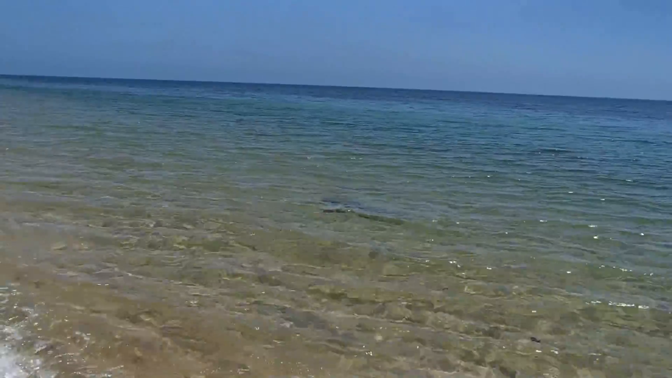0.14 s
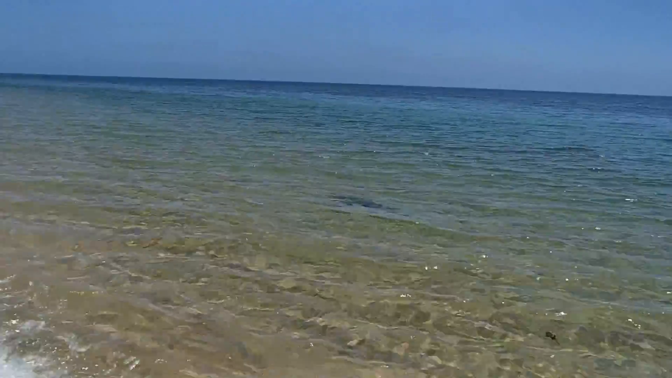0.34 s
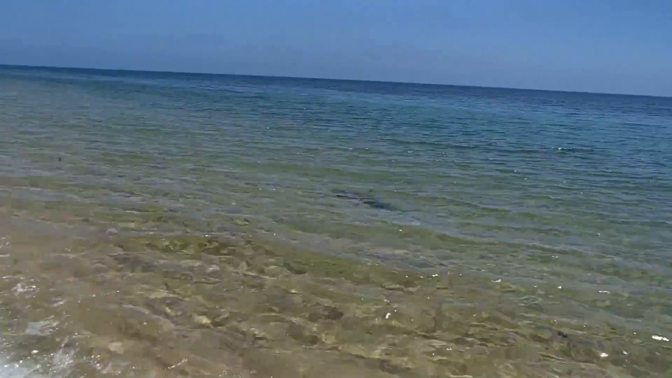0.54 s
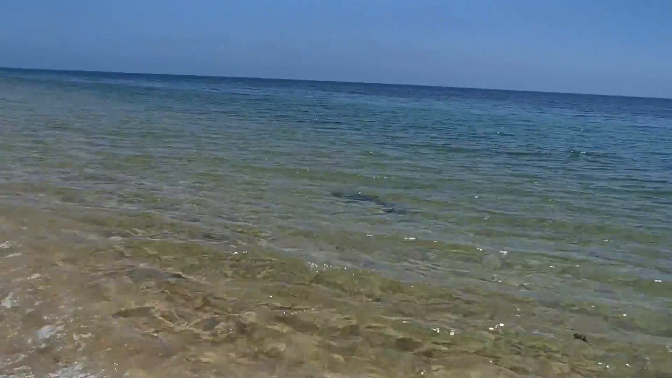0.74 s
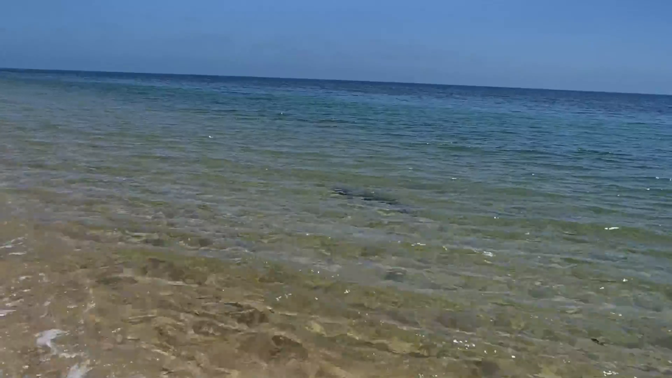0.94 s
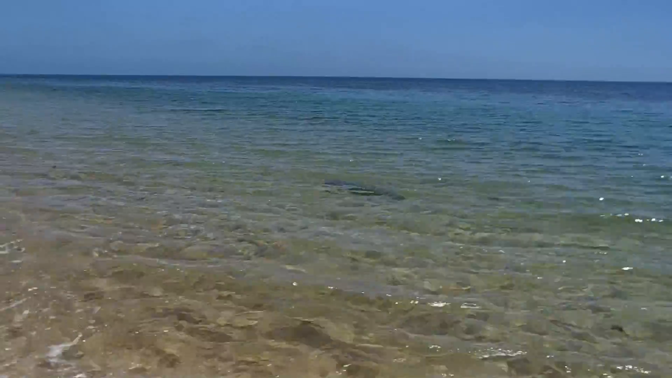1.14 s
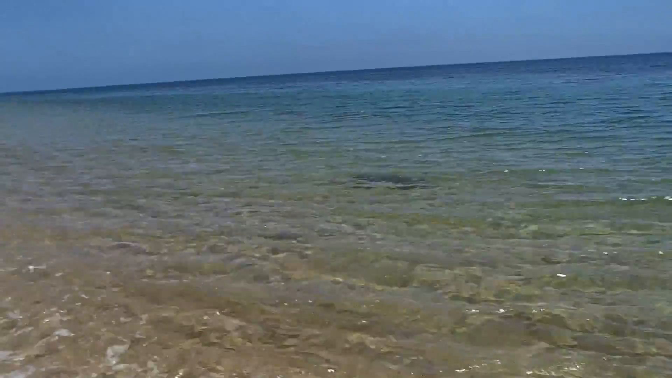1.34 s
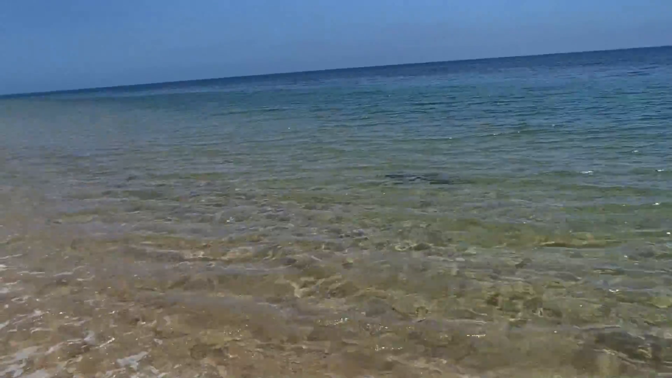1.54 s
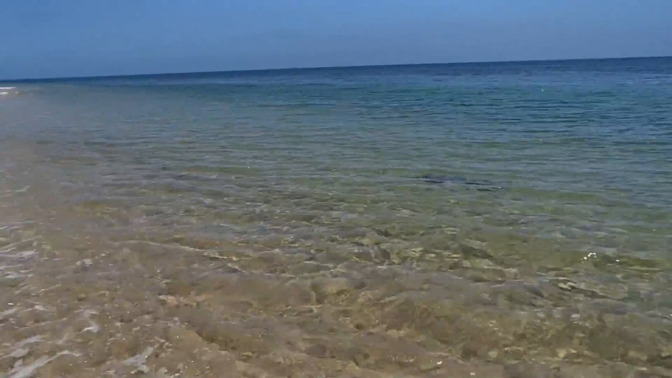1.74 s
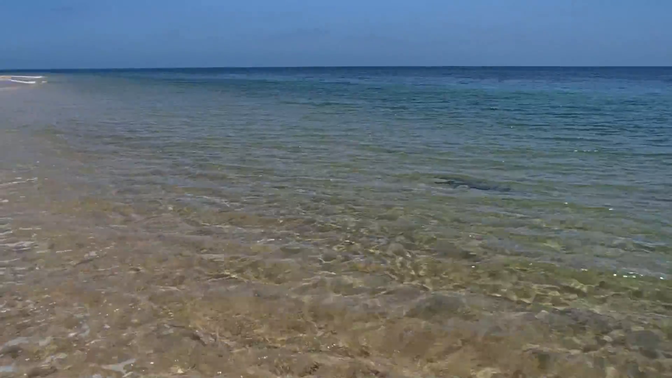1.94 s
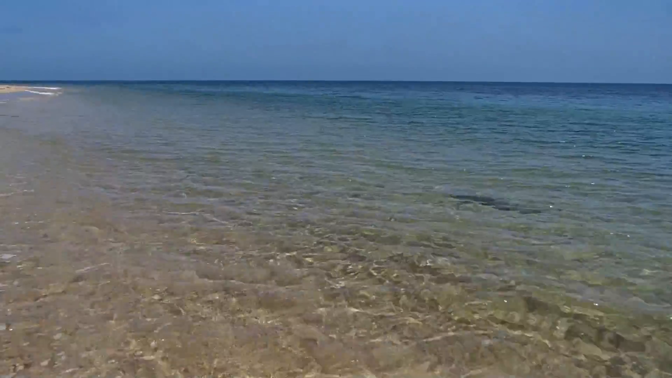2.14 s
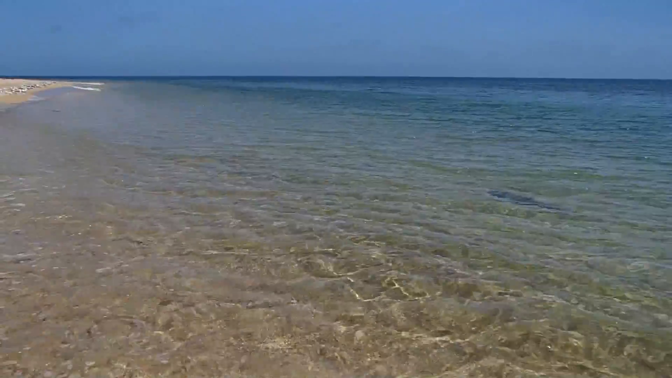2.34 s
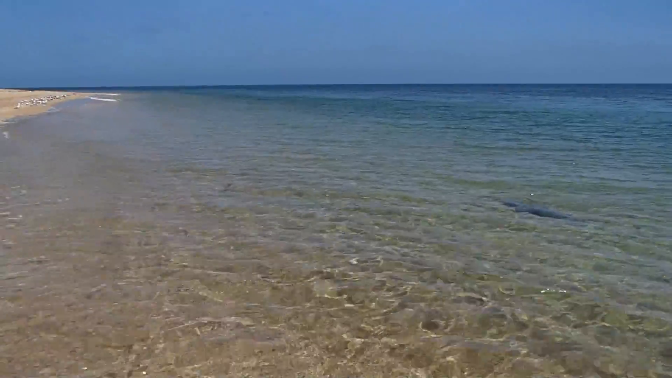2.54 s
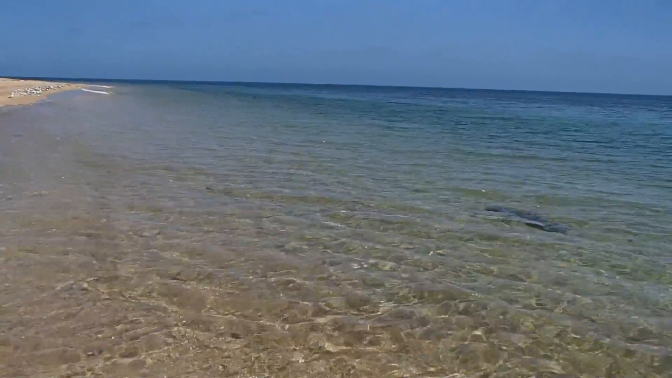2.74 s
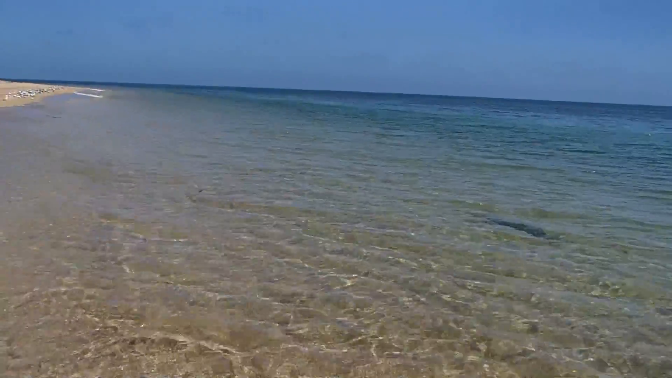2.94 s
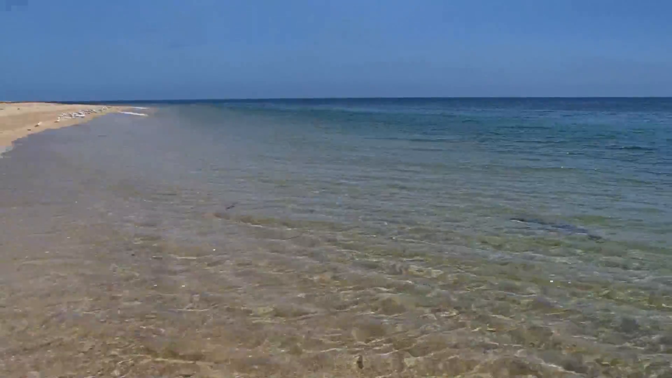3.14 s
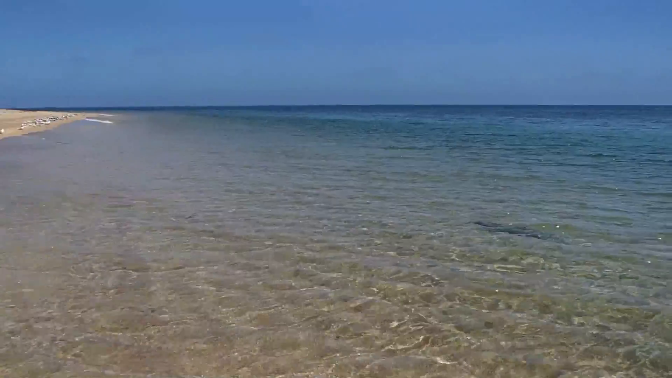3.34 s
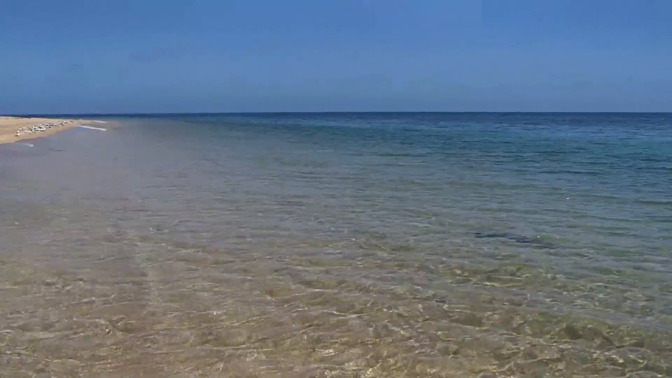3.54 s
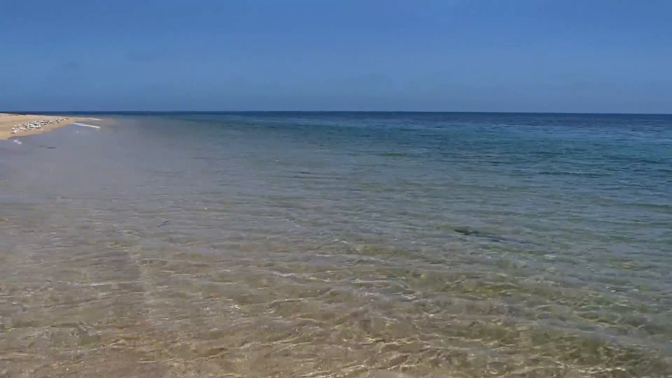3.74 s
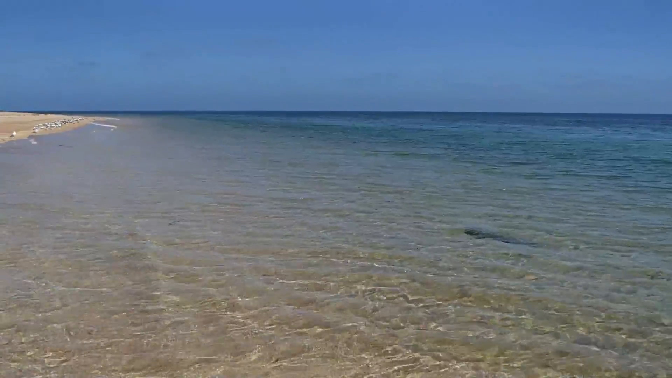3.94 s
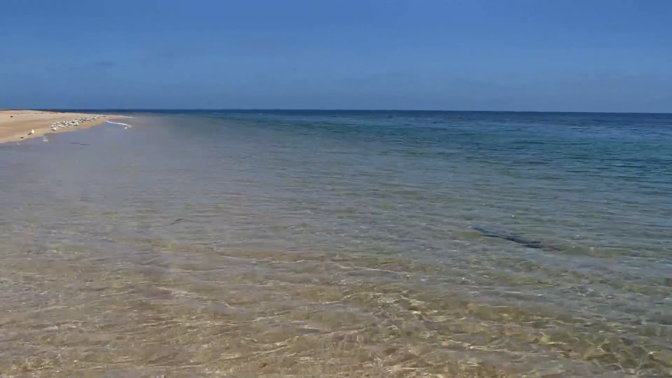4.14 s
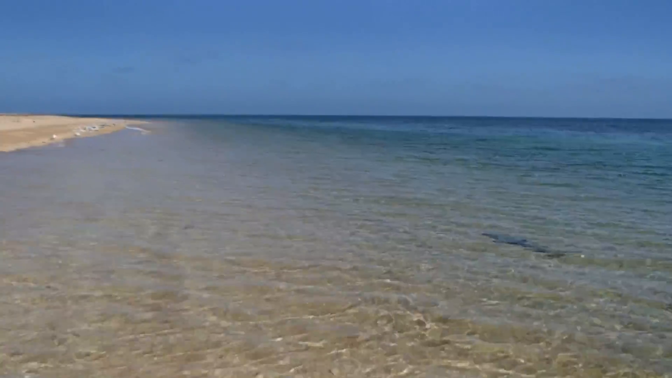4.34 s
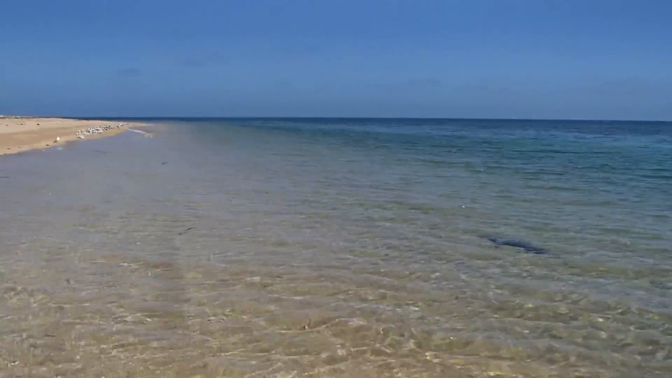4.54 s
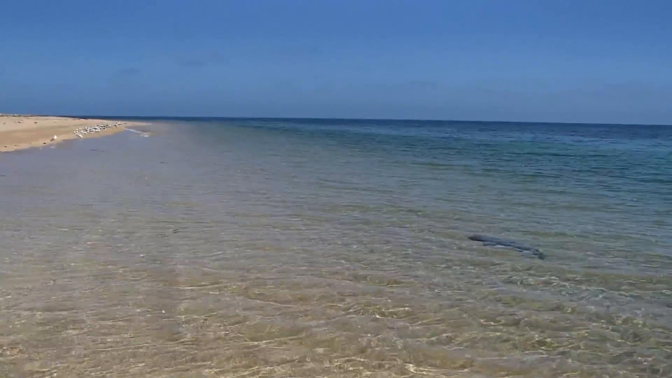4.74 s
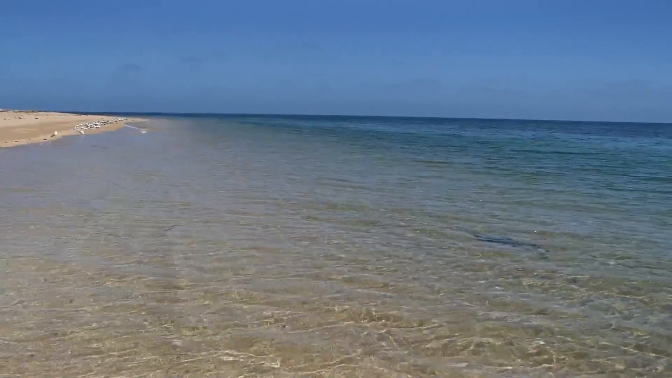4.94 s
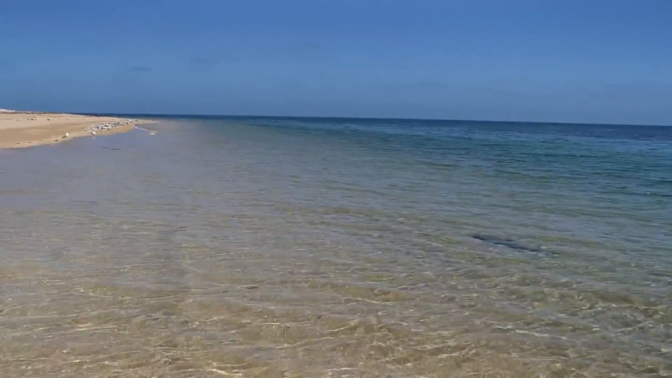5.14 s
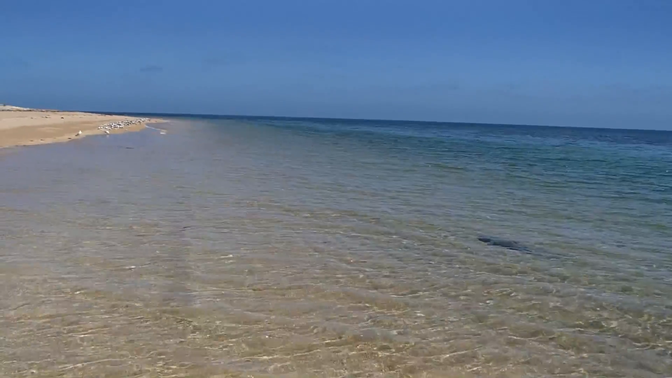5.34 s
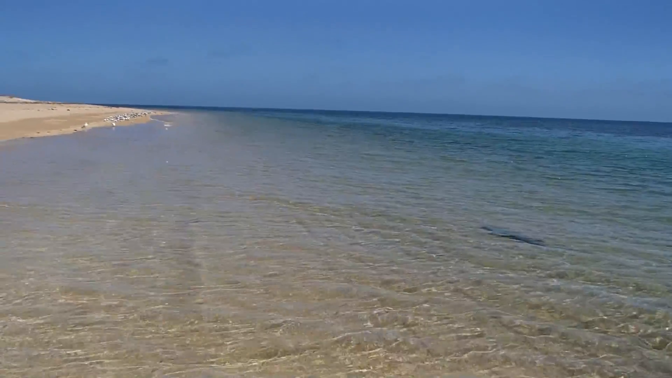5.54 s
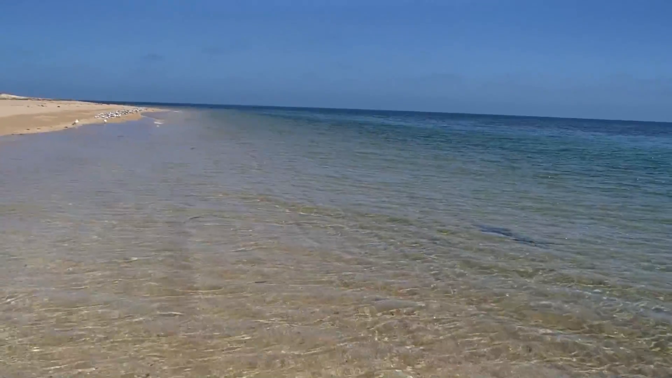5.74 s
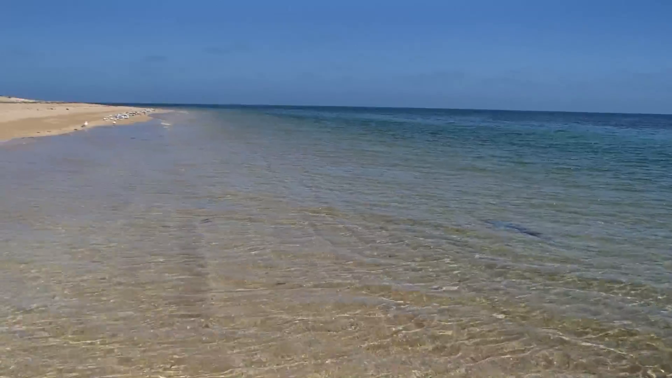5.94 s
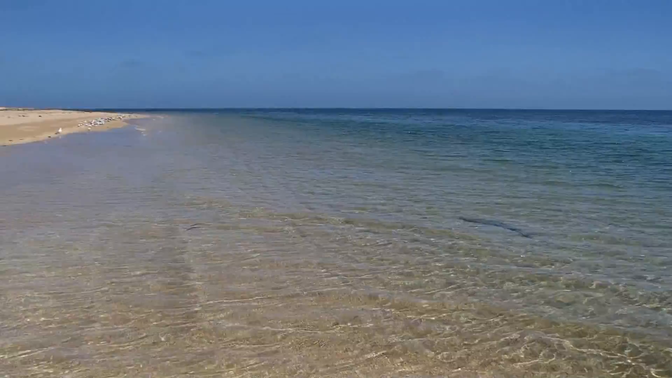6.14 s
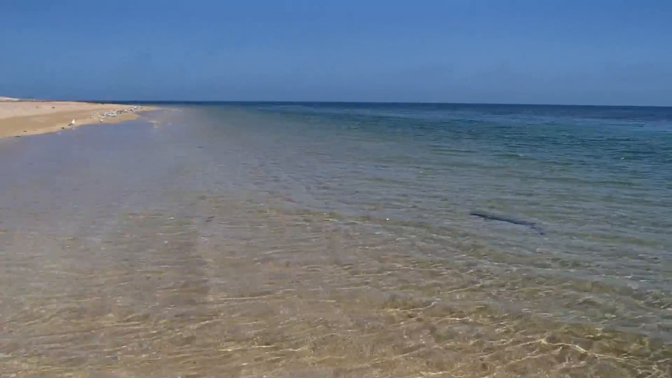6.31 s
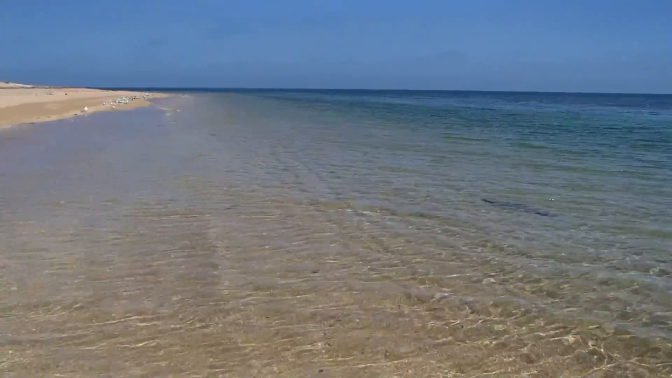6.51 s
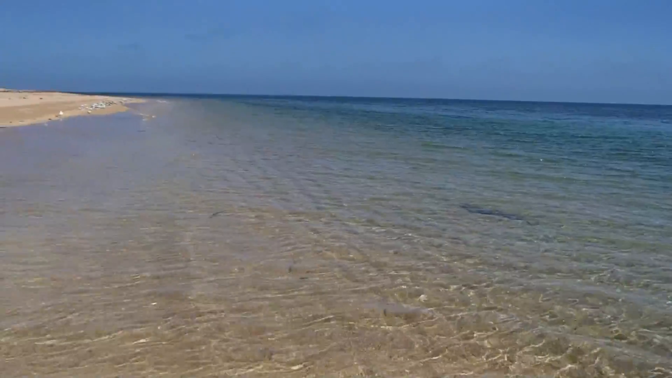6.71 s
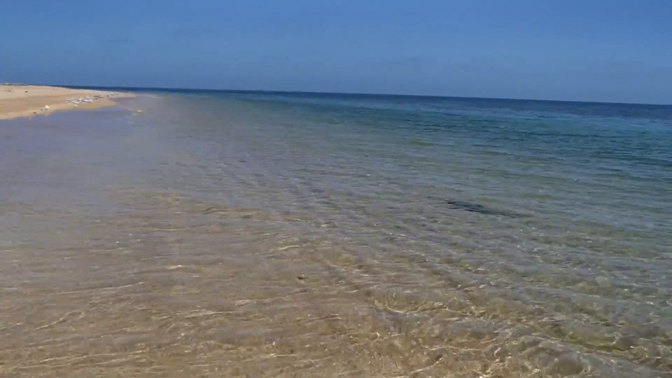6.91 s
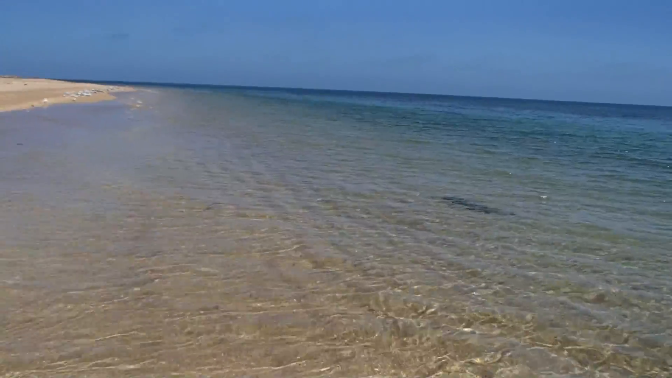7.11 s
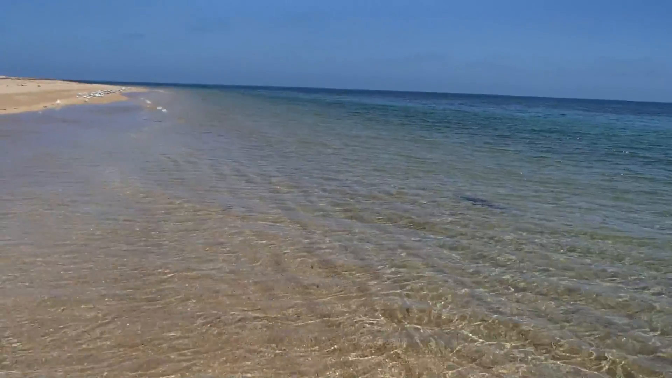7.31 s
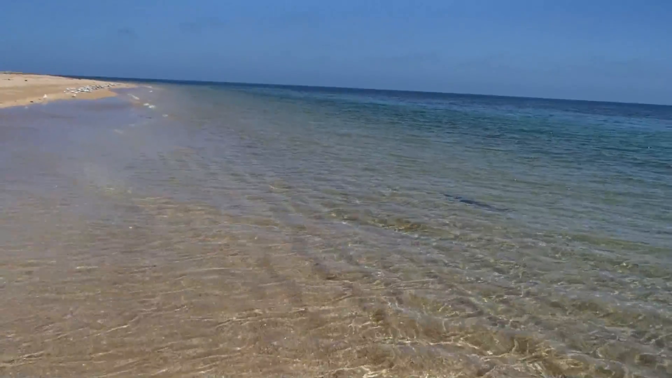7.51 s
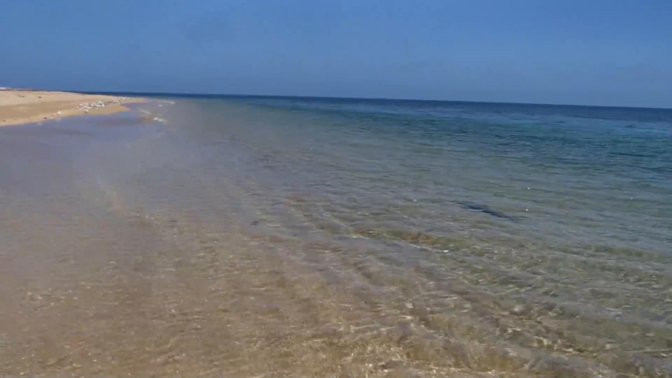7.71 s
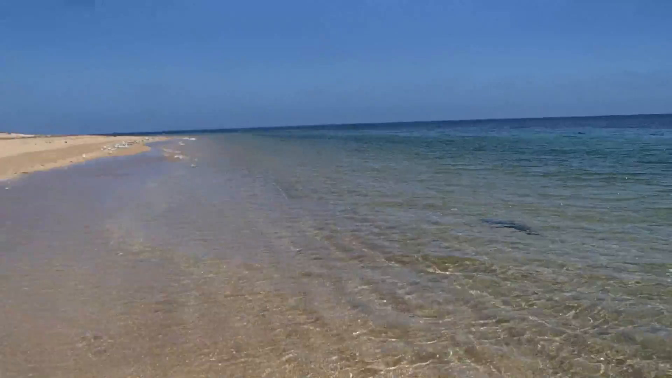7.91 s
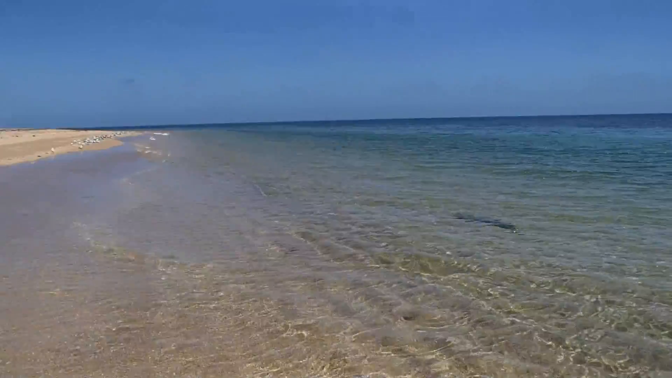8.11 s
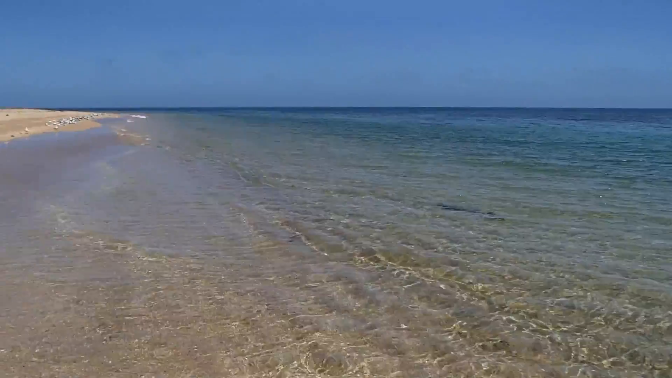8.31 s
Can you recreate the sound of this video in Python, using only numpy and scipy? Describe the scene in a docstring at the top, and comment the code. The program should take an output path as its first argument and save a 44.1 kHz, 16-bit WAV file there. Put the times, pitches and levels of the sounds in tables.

```python
"""Small waves on a sandy shore

Waves spill, run up the sand and fizz out, then ripples lap, plop and gulp, close to a camera in a plastic case.
Water is swarms of ringing bubbles over shaped noise; slaps and gulps are short tones of trapped air.
Light wind is low noise on the microphone. The case squeaks under the grip (harmonics), clicks (modes)
and thumps low under a hand, twice (a short tone with splatter noise, like the slaps)."""
import sys
import numpy as np
from scipy.fft import rfft, irfft, next_fast_len
from scipy.io import wavfile
from scipy.ndimage import map_coordinates

SR = 44100
rng = np.random.default_rng(int(sys.argv[2]) if len(sys.argv) > 2 else 0)


def write(x):
    x = np.atleast_2d(x).T
    wavfile.write(sys.argv[1], SR, np.round(np.clip(x, -1, 1) * 32767).astype(np.int16))

N = 373527  # length in samples, about 8.5 s


def amp(db):
    """Decibels to gain."""
    return np.exp(np.asarray(db) * float(np.log(10) / 20))


def decibels(power):
    """Power to decibels."""
    return 10 * np.log10(power + 1e-20)


def unit(x):
    """Scale to rms 1."""
    return x / np.sqrt(np.mean(x ** 2) + 1e-20)


def wobble(rate, size=N):
    """A smooth random curve through `rate` random points a second."""
    points = rng.standard_normal(int(size * rate / SR) + 4)
    return map_coordinates(points, [np.arange(size) * rate / SR])


def coloured(x, spectrum):
    """Filter x through (f/Hz, level/dB) points on a log frequency axis, then scale to rms 1."""
    m = next_fast_len(len(x) + 8192)  # spare room so the end does not wrap to the start
    hz, db = np.transpose(spectrum)
    log_hz = np.log(np.fft.rfftfreq(m, 1 / SR) + 1)  # +1 avoids log of zero
    gain = amp(np.interp(log_hz, np.log(hz), db))
    return unit(irfft(rfft(x, m) * gain, m)[:len(x)])


def fade(t, t60):
    """Exponential decay that falls 60 dB in t60."""
    return np.exp(t * (-float(np.log(1000)) / t60))


def add(track, s, sound):
    """Mix a sound into the track at time s, cut off at the track's end."""
    part = track[round(s * SR):][:len(sound)]
    part += sound[:len(part)]


def bubbles(rate, low_hz, high_hz, cycles, spread_db, rise=0.2, soft=0.23, size=900):
    """A swarm of damped rings of random size whose pitch climbs as they die."""
    count = int(rate * N / SR)
    when, pitch, strength, life = rng.random((count, 4)).astype(np.float32).T[:, :, None]
    hz = low_hz * (high_hz / low_hz) ** pitch
    t60 = np.minimum(cycles * (.5 + life) / hz, size / SR)
    t = np.arange(size, dtype=np.float32) / SR
    gain = amp(spread_db * np.minimum(-np.log(1 - strength), 5))  # a few bubbles are much louder
    age = np.minimum(t / t60, 1)  # share of the bubble's life
    envelope = gain * fade(age, 1) * (1 - fade(age, soft))  # soft start, then decay
    rings = envelope * np.sin(2 * np.pi * hz * t * (1 + rise / 2 * age))
    places = (when * N).astype(int) + np.arange(size)
    return np.bincount(places.ravel(), rings.ravel(), N)[:N]


def swell(crest_s, db, rise, fall):
    """Power that climbs to a crest and dies away, both in dB/s."""
    t = np.arange(N) / SR - crest_s
    return amp(db + np.minimum(rise * t, -fall * t)) ** 2


def surf():
    """Levels in dB of plunging, churning, foam, spray and falling drops, all driven by the waves."""
    # waves that swell to a crest and drain: (crest t/s, churning level/dB, rise/(dB/s), fall/(dB/s),
    # foam level/dB, spray level/dB before the lift in wash, falling drops level/dB)
    waves = [(.8, -26.5, 4.7, 37, -26.3, -40, -37), (1.08, -24, 32, 16.5, -25.3, -42, -47),
             (1.31, -24.5, 16.5, 52, -22.5, -35, -44), (1.88, -32.5, 35, 20, -35.5, -48.5, -49),
             (2.53, -35, 48, 8.5, -39, -58.5, -44), (3.5, -38.5, 39, 10.5, -44, -62.5, -47),
             (4.02, -42, 23, 18.5, -52.5, -62, -45.5), (4.53, -58, 11.5, 15.5, -37.5, -55.5, -56),
             (5.82, -46.6, 46, 19, -55.5, -73, -57), (6.66, -47, 30, 60, -58, -64, -58),
             (7.67, -47, 112, 30, -55, -70, -44.5), (7.82, -36.4, 75, 47, -41.5, -55.7, -41),
             (8.46, -40.5, 12, 20, -45.5, -63, -44)]
    # a wave folds over and traps a big pocket of air: (t/s, level/dB, rise/(dB/s), fall/(dB/s))
    breaks = [(1.28, -31.5, 80, 110), (1.57, -43.5, 42, 28.5), (2.72, -52.5, 72, 27), (3.72, -55, 80, 70),
              (8.08, -57.5, 40, 50)]
    calm_plunge_db, calm_churn_db, calm_foam_db, calm_spray_db = -65, -50, -53.5, -61.5  # between waves
    plunge_below_churn_db = -22.5  # big air pockets, relative to the churning
    fizz_below_churn_db, fizz_fall_db_per_s = -25.5, 5.5  # fine froth left behind by each crest

    churn, foam, spray, drops = np.zeros((4, N))  # powers
    for s, db, rise, fall, foam_db, spray_db, drops_db in waves:
        wave = swell(s, 0, rise, fall)
        churn += wave * amp(db) ** 2
        foam += wave * amp(foam_db) ** 2
        drops += wave * amp(drops_db) ** 2
        fizz = swell(s, db + fizz_below_churn_db, rise, fizz_fall_db_per_s)
        spray += wave * amp(spray_db) ** 2 + fizz
    plunge = churn * amp(plunge_below_churn_db) ** 2 + sum(swell(*row) for row in breaks)

    def over(power, calm_db):
        """Add the calm water's power and give the level in dB."""
        return decibels(power + amp(calm_db) ** 2)

    return (over(plunge, calm_plunge_db), over(churn, calm_churn_db), over(foam, calm_foam_db),
            over(spray, calm_spray_db), decibels(drops))


def water(spectrum, swarm, share, restless_db):
    """Near bubbles over the blur of countless far ones, swelling unevenly."""
    blur = coloured(rng.standard_normal(N), spectrum)
    mix = np.sqrt(1 - share) * blur + np.sqrt(share) * coloured(swarm, spectrum)
    return unit(mix * amp(restless_db * unit(wobble(22) + wobble(60))))


def wash(plunge_db, churn_db, foam_db, spray_db):
    """Big air pockets boom, middling ones churn, foam bursts on the sand and spray prickles."""
    # how bright each kind of water sounds: (f/Hz, relative level/dB)
    plunge_colour = [(70, -33), (130, -19), (200, -4.5), (300, 0.5), (400, 3), (480, -2), (700, -15),
                     (1500, -60)]
    churn_colour = [(250, -58), (480, -11), (620, -5), (780, -1.5), (1200, 0.5), (1600, -3), (2200, -3.5),
                    (3000, -12.5), (5000, -49), (9000, -50)]
    foam_colour = [(900, -32), (1800, -8), (2600, -2.5), (3400, 1.5), (3800, 1), (4200, -5.5), (4600, -2.5),
                   (5050, 0), (5700, -7.5), (6600, -12), (8500, -23), (14000, -56)]
    spray_colour = [(3500, -8), (6000, -0.5), (7500, 0.5), (9500, 0.5), (12000, -1), (15000, 1.5),
                    (16000, -1)]

    # share of single bubbles: those of the churning merge in the full rush, those of the spray stand out
    churn_share = .5 / (1 + amp(churn_db + 21.5))
    spray_share = 0.31 * amp(spray_db + 50.0) / (1 + amp(spray_db + 49))

    pockets = bubbles(110, 157, 526, cycles=9.8, spread_db=2.0, size=2400)
    plunge = water(plunge_colour, pockets, share=0.31, restless_db=1.8)
    middling = bubbles(520, 547, 3010, cycles=28, spread_db=3.0)
    churn = water(churn_colour, middling, share=churn_share, restless_db=0.9)
    froth = bubbles(1200, 1844, 6720, cycles=13.4, spread_db=3.5, size=300)
    foam = water(foam_colour, froth, share=0.23, restless_db=1.0)
    prickles = bubbles(450, 5500, 15800, cycles=4.8, spread_db=5.5, size=100)
    spray = water(spray_colour, prickles, share=spray_share, restless_db=0.9)

    surge = amp(0.15 * wobble(25))  # the whole sheet of water moves together
    low = amp(plunge_db) * plunge + amp(churn_db) * churn
    high = amp(foam_db) * foam + amp(spray_db + 2.0) * spray  # spray is lifted by 2 dB
    return surge * (low + high)


def trickle(drops_db):
    """Single drops ping as they hit the surface."""
    pings = bubbles(260, 1360, 5340, cycles=23, spread_db=2.5, rise=.15, soft=0.17)
    return amp(drops_db) * unit(pings)


def wind():
    """Soft lumps of air on the microphone port, stronger in each gust."""
    # gusts over a light breeze: (t/s, level/dB)
    gusts = [(0.03, -65), (.86, -60), (1.53, -60), (2.22, -63), (5.02, -71), (6.82, -63), (7.18, -64),
             (8.03, -58), (8.46, -63)]
    # colour of the low rumble: (f/Hz, relative level/dB)
    rumble = [(12, -32), (25, -9), (42, -3.5), (70, -2), (120, -5), (200, -10), (500, -40)]
    breeze_db, gust_width_s = -68.5, 0.15

    t = np.arange(N) / SR
    power = amp(breeze_db) ** 2
    power = power + sum(amp(db) ** 2 * np.exp(-((t - s) / gust_width_s) ** 2) for s, db in gusts)
    lumps = coloured(rng.standard_normal(N), rumble) * amp(2.3 * wobble(9))
    return np.sqrt(power) * unit(lumps)


def soft_cap(db, most_db):
    """A level that flattens out gently at most_db."""
    return -decibels(amp(-db) ** 2 + amp(-most_db) ** 2)


def plops(churn_db):
    """Rows for slaps_and_thumps(): small plops at random times, louder where the water churns more."""
    plops_per_s, middle_hz, spread_octaves, splatter_share = 3, 1580, .8, 0.6
    over_churn_db, cap_db, spread_db = 10, -23, 3.5  # the random spread (+ or -) comes after the cap
    ring_cycles = 52  # a pocket of air rings for so many cycles

    count = int(plops_per_s * N / SR)
    when, size, pitch = rng.random((count, 3)).T
    at = ((np.arange(count) + when) / count * (N - 1)).astype(int)  # one in each equal slice of time
    db = soft_cap(churn_db[at] + over_churn_db, cap_db) + spread_db * (2 * size - 1)
    hz = middle_hz * 2 ** (spread_octaves * (2 * pitch - 1))
    return list(zip(at / SR, db, hz, ring_cycles / hz, np.full(count, splatter_share)))


def slaps_and_thumps(rows):
    """A ringing tone (air trapped by a slap, or a thumped case) and splatter noise that follows its pitch."""
    # colour of the splatter: (multiple of the tone's pitch, relative level/dB)
    splatter_colour = np.array([(.1, -42), (.4, -6.5), (.7, 2), (1, 4), (1.5, -3), (2.6, -15.5), (4, -24.5),
                                (10, -26)])

    out, t = np.zeros(N), np.arange(SR // 6) / SR
    for s, db, hz, t60, share in rows:
        # the pitch creeps up and wavers
        phase = 2 * np.pi * hz * t * (1 + 0.041 * t / t60) + .5 * wobble(hz / 4, len(t))
        splatter = 0.69 * coloured(rng.standard_normal(len(t)), splatter_colour * [hz, 1])
        body = np.sqrt(1 - share) * np.sin(phase) + np.sqrt(share) * splatter
        onset = 1 - np.exp(-(t / (0.00025 + 0.018 * t60)) ** 2)  # long sounds also begin more softly
        add(out, s, amp(db) * body * fade(t, t60) * onset)
    return out


def glide(length, start_hz, end_hz):
    """Phase and rounded envelope of a short sliding tone."""
    u = np.linspace(0, 1, int(length * SR))
    phase = 2 * np.pi * np.cumsum(start_hz + (end_hz - start_hz) * u) / SR
    return phase, np.sqrt(np.abs(np.sin(np.pi * u)))


def gulps():
    """The pitch of a big, wobbling bubble shoots up as it nears the surface."""
    # a large bubble rising: (t/s, length/s, start f/Hz, end f/Hz, level/dB)
    rising = [(3.889, 0.039, 616, 1620, -26)]

    out = np.zeros(N)
    for s, length, start_hz, end_hz, db in rising:
        phase, envelope = glide(length, start_hz, end_hz)
        level = amp(db + 2.7 * wobble(394, len(phase)))
        tone = np.sin(phase + 0.5 * wobble(447, len(phase)))
        add(out, s, level * envelope * tone)
    return out


def squeaks():
    """Stick and slip on plastic: a thin, juddering stack of harmonics that arches in pitch."""
    # the grip rubbing on the case: (t/s, length/s, top f/Hz of the fundamental, level/dB, judder/dB)
    strokes = [(4.495, 0.077, 1275, -41, 0), (6.934, .052, 1326, -49, 7), (7.323, 0.028, 1214, -42, 9),
               (7.351, 0.025, 1256, -45.5, 7), (7.407, .058, 1247, -46.5, 5), (7.875, 0.047, 1380, -44, 9),
               (8.33, .05, 1240, -41, 5)]
    # the tone: (harmonic number, relative level/dB)
    harmonics = [(1, -6), (2, 8), (3, 6), (4, 4.5), (5, -29.5)]
    top_at, sag = 0.355, 0.404  # share of the stroke at the top pitch; how steeply it sags either side

    out = np.zeros(N)
    for s, length, top_hz, db, judder_db in strokes:
        u = np.linspace(0, 1, int(length * SR))
        hz = top_hz * (1 - sag * (u - top_at) ** 2)
        phase = 2 * np.pi * np.cumsum(hz) / SR + 0.063 * judder_db * wobble(390, len(u))
        tone = sum(amp(level) * np.sin(round(k) * phase) for k, level in harmonics)
        envelope = np.sqrt(np.abs(np.sin(np.pi * u)))
        judder = amp(judder_db * np.tanh(wobble(253, len(u))))
        add(out, s, amp(db) * unit(tone * envelope * judder))
    return out


def clicks():
    """A hard snap: the high modes of the case die at once, its hollow rings a little longer."""
    # the case snapping: (t/s, relative level/dB, hardness: f/Hz above which the blow is weak)
    snaps = [(6.8614, -0.5, 14000), (7.4614, -22, 2980)]
    # ringing modes of the case: (f/Hz, relative level/dB, time to fall 60 dB t60/s)
    modes = [(160, -33, 0.019), (829, -8.5, 0.039), (1370, -15.5, 0.017), (1930, -7.5, 0.0093),
             (2500, -5.5, 0.005), (3210, -5.5, 0.0075), (4130, -3, .003), (5070, -5.5, 0.007),
             (7100, -7.5, 0.0045), (9650, -15, .004), (14800, -29, .003)]

    out, t = np.zeros(N), np.arange(SR // 10) / SR
    for s, db, hard_hz in snaps:
        def drive(hz):
            """How strongly the blow excites a frequency."""
            return 1 / np.sqrt(1 + (hz / hard_hz) ** 4)

        ring = np.zeros(len(t))
        for k, (hz, level, t60) in enumerate(modes):
            sign = (-1) ** k  # neighbouring modes start in opposite directions
            ring += sign * amp(level) * drive(hz) * fade(t, t60) * np.sin(2 * np.pi * hz * t)
        crack = amp(-17) * fade(t, 0.0067) + amp(-37) * fade(t, 0.1)  # with a faint scatter from the water
        noise = drive(7000) * crack * rng.standard_normal(len(t))
        add(out, s, amp(db) * (ring + noise))
    return out


def scene():
    """One microphone feeds both channels."""
    # water slapping on water, and two low thumps of a hand on the case (near 140 Hz):
    # (t/s, level/dB, starting f/Hz of the tone, time to fall 60 dB t60/s, share of splatter 0-1)
    slap_and_thump_rows = [(1.0762, -5, 3730, 0.015, 0.7), (1.3258, 1, 3530, 0.0079, .2),
                           (1.8702, -10.5, 1530, .026, .8), (1.922, -11, 1490, 0.023, .46),
                           (2.115, -16.5, 3860, .014, 0), (2.183, -15.5, 4460, .019, 0.36),
                           (2.186, -39.5, 140, 0.074, .6), (2.441, -22, 1250, .033, 1),
                           (2.57, -18, 5000, 0.0065, .6), (2.703, -43, 143, .1, .8),
                           (3.061, -19.5, 4400, 0.011, 0.74), (3.214, -20.5, 1910, .015, .2),
                           (3.2865, -23, 1386, 0.049, .6), (3.55, -25, 1020, 0.084, 0.2),
                           (3.567, -19, 2230, .026, .98), (3.586, -14, 1680, .019, 0.5),
                           (3.889, -14, 3870, 0.0067, 0.6), (3.993, -21, 1150, 0.043, 0.7),
                           (4.032, -21.5, 1980, .033, 0.6), (4.5571, -18.5, 1550, .021, 0.75),
                           (4.623, -25, 1600, 0.012, .6), (5.199, -31, 1250, .035, 0.26),
                           (5.636, -24.5, 1600, 0.018, 0.7), (6.495, -35, 767, .1, .26),
                           (6.631, -23.5, 2480, 0.028, 0.1), (7.159, -33, 1090, .046, .6),
                           (7.632, -19.5, 2560, 0.0092, 0.96), (7.664, -20.5, 2010, 0.031, 0.5),
                           (7.731, -20.5, 1880, .026, 0.45), (7.797, -23, 1400, .065, 1),
                           (7.821, -18.5, 2000, .06, 1), (7.843, -21, 1390, 0.032, .7),
                           (7.912, -23.5, 1910, .021, 1), (8.093, -28.5, 880, 0.14, .37),
                           (8.113, -22.5, 5700, 0.0046, 0.9), (8.2795, -20, 1600, .021, 0.98),
                           (8.453, -26, 1500, .069, 0.6)]

    plunge_db, churn_db, foam_db, spray_db, drops_db = surf()
    sea = wash(plunge_db, churn_db, foam_db, spray_db) + trickle(drops_db)
    single_sounds = slaps_and_thumps(plops(churn_db)) + slaps_and_thumps(slap_and_thump_rows) + gulps()
    mono = sea + wind() + single_sounds + squeaks() + clicks()
    return np.array([mono, mono])


def record(dry):
    """The camera clips at full scale and keeps nothing above its band limit."""
    top_hz = 15850
    m = next_fast_len(N + SR // 2)
    keep = np.fft.rfftfreq(m, 1 / SR) < top_hz
    return irfft(rfft(np.clip(dry, -1, 1), m) * keep, m)[:, :N]


dry = scene()
out = record(dry)
write(out)
```